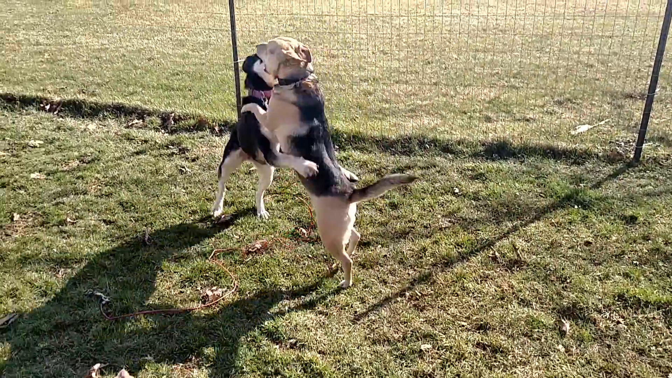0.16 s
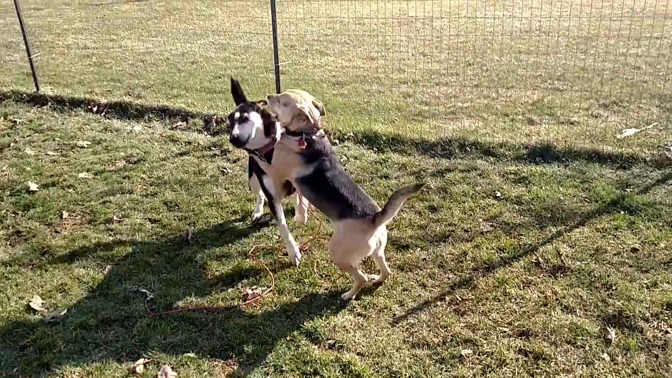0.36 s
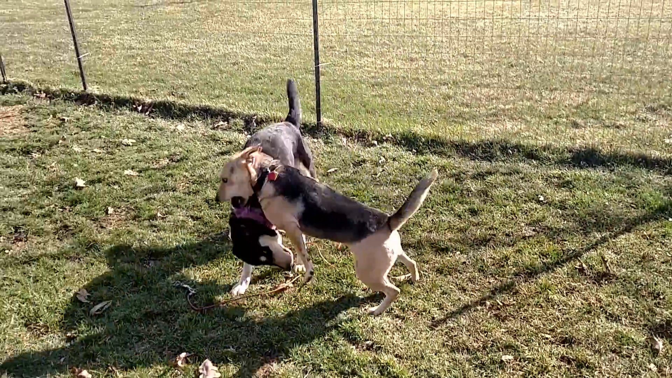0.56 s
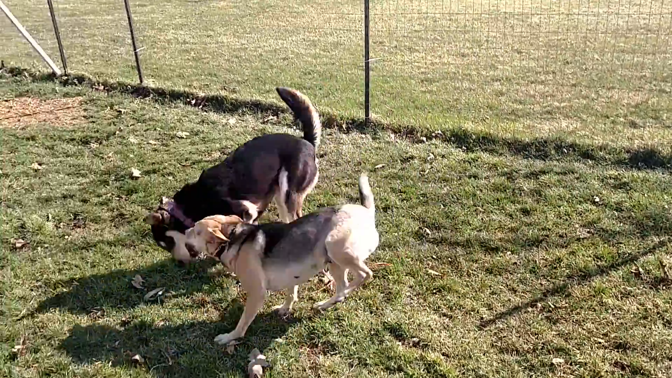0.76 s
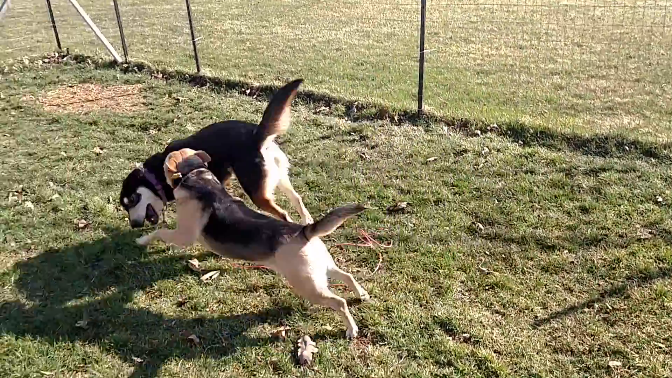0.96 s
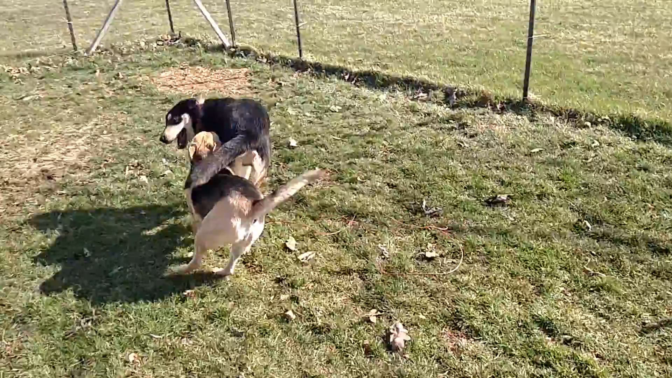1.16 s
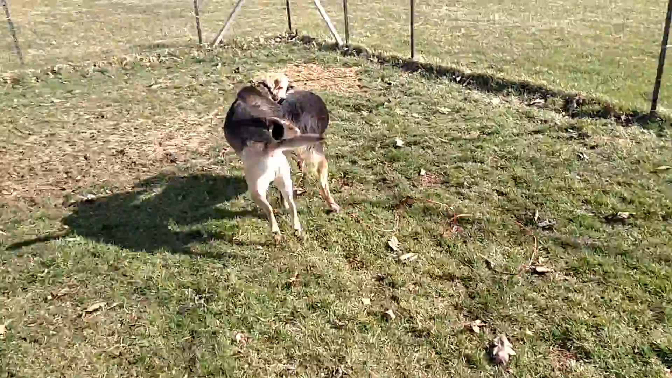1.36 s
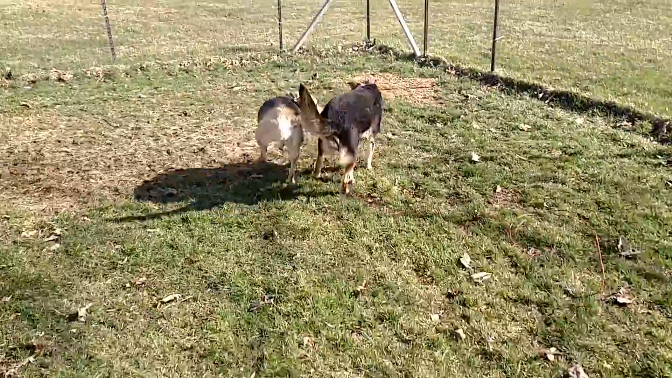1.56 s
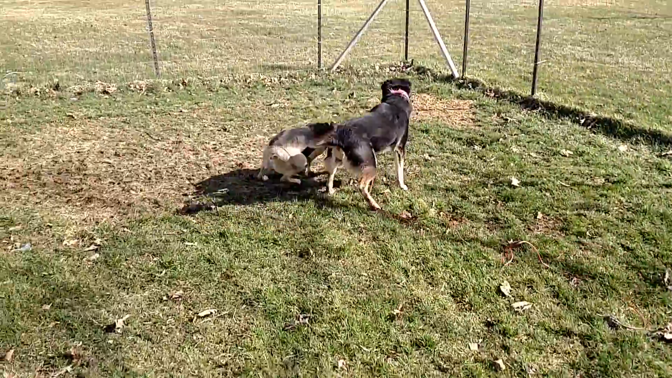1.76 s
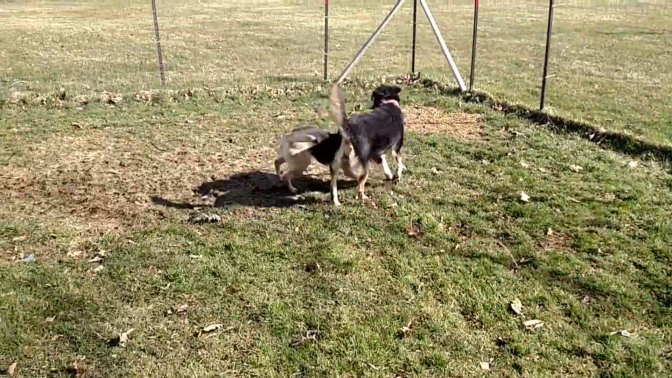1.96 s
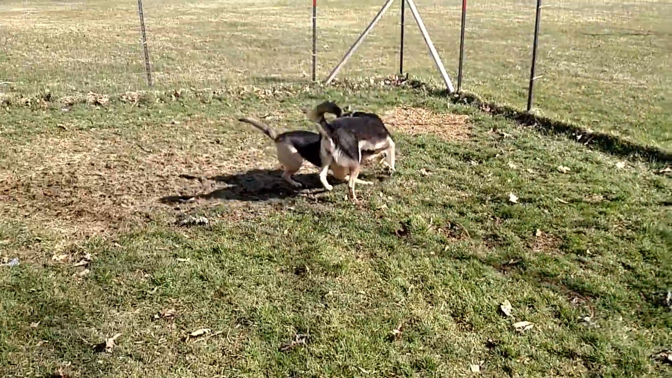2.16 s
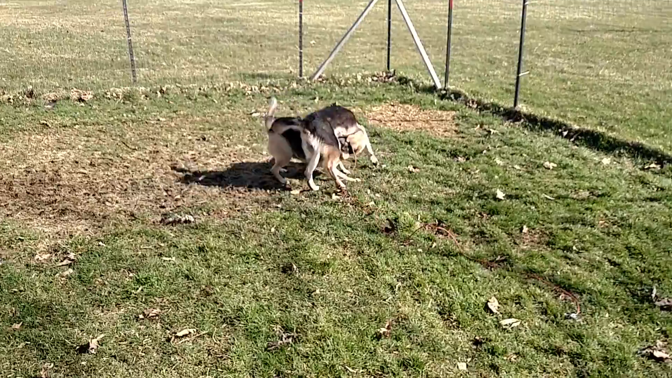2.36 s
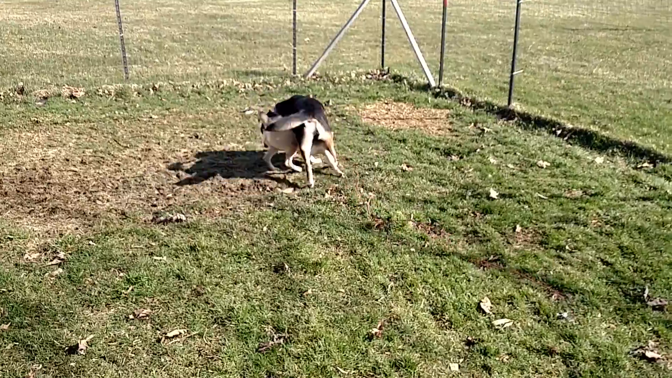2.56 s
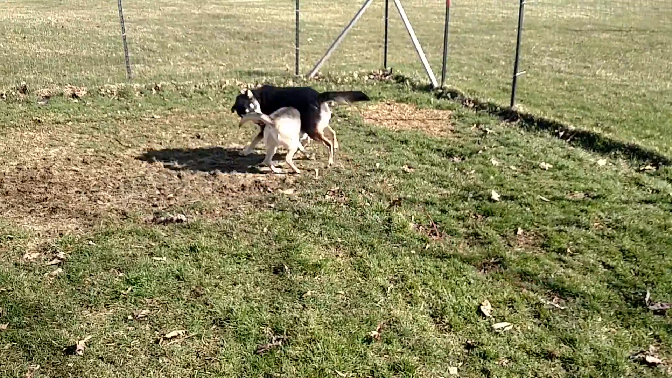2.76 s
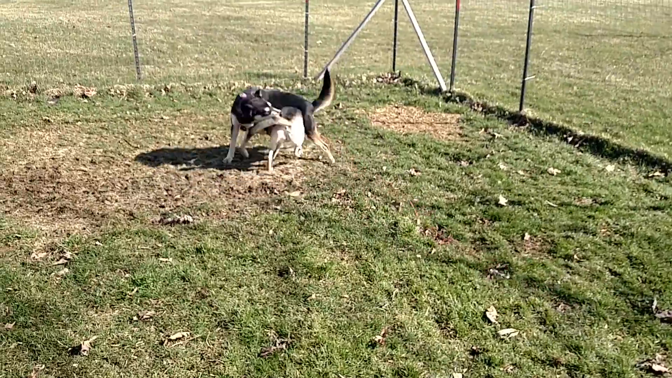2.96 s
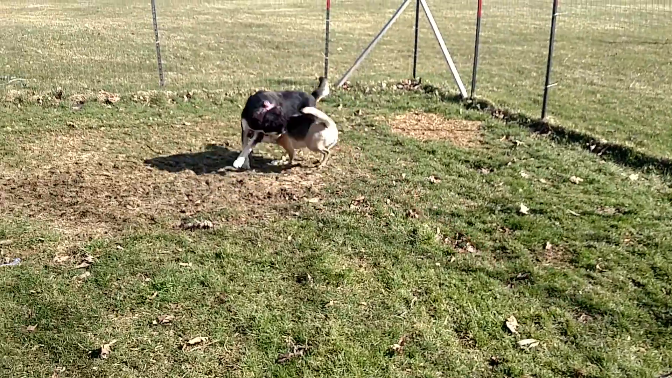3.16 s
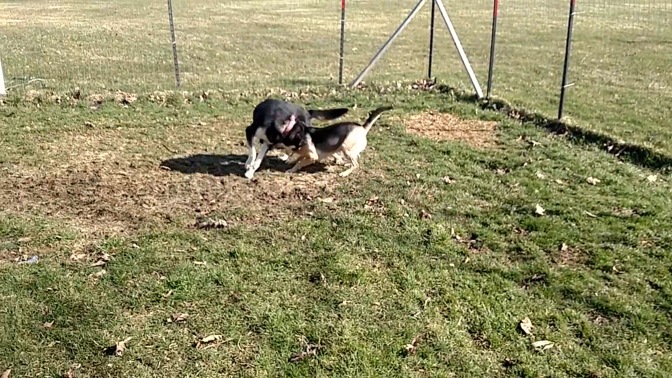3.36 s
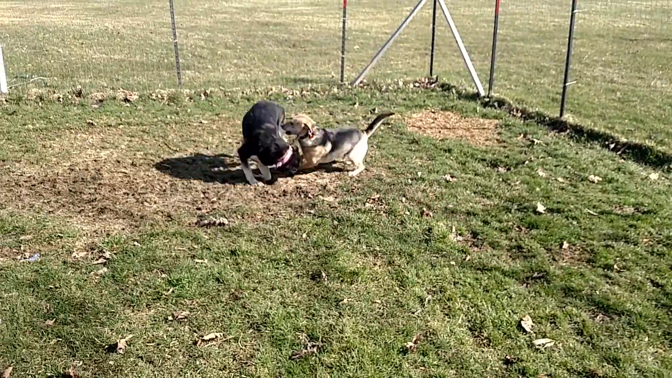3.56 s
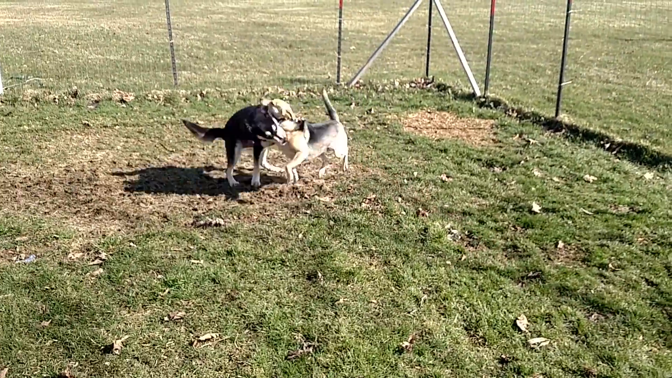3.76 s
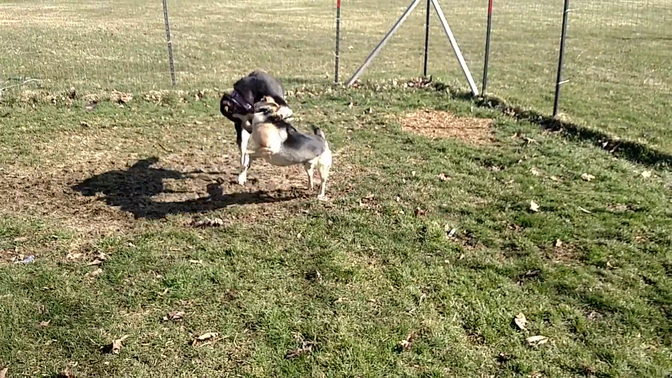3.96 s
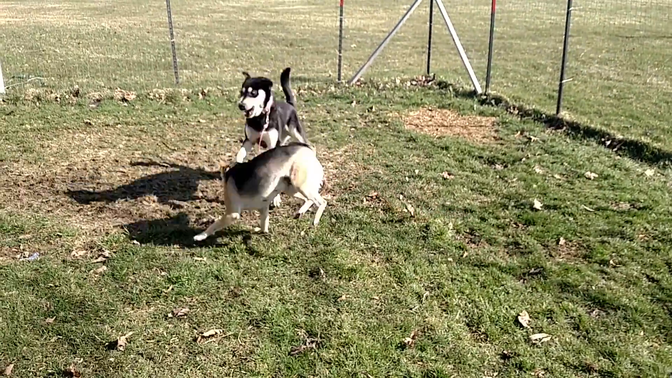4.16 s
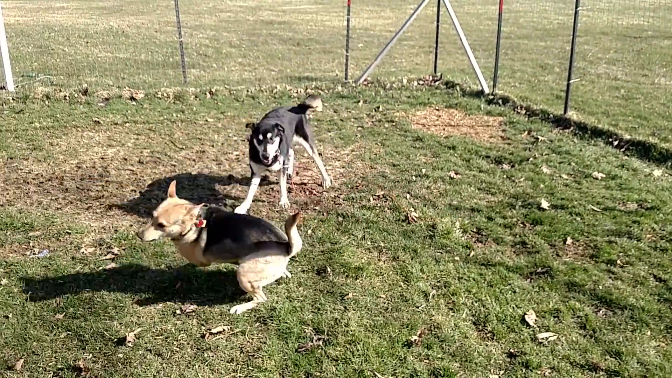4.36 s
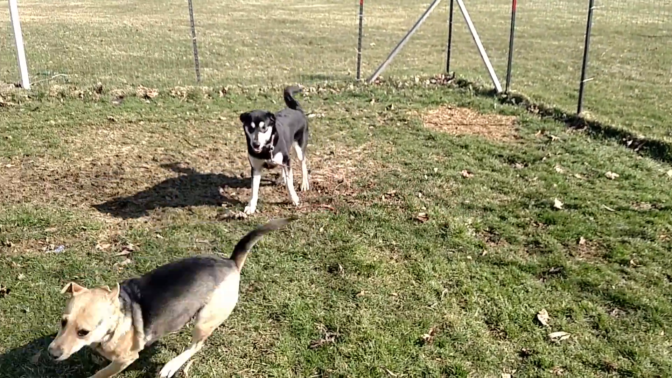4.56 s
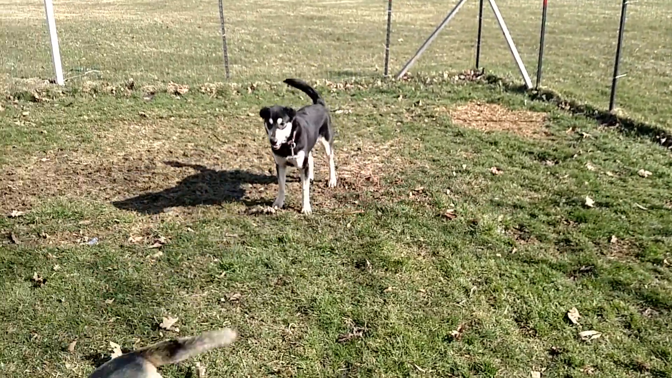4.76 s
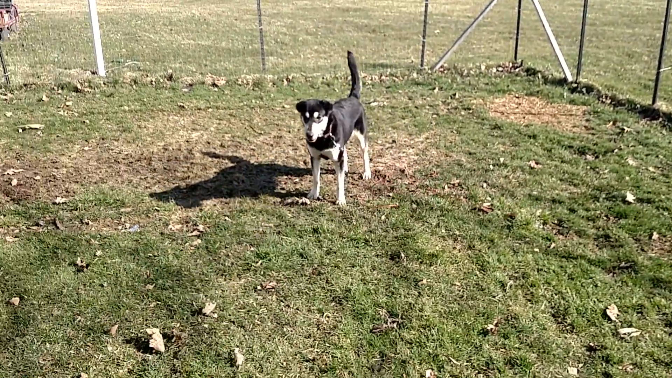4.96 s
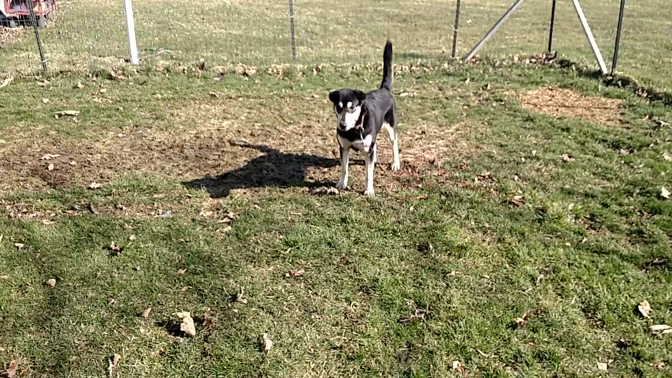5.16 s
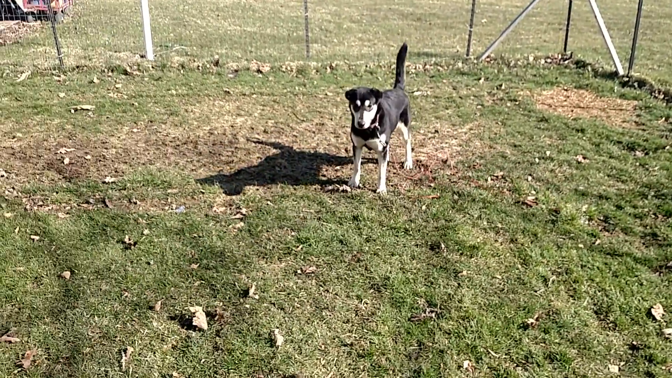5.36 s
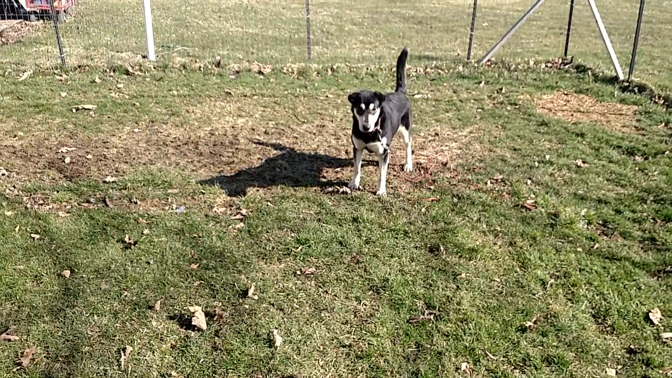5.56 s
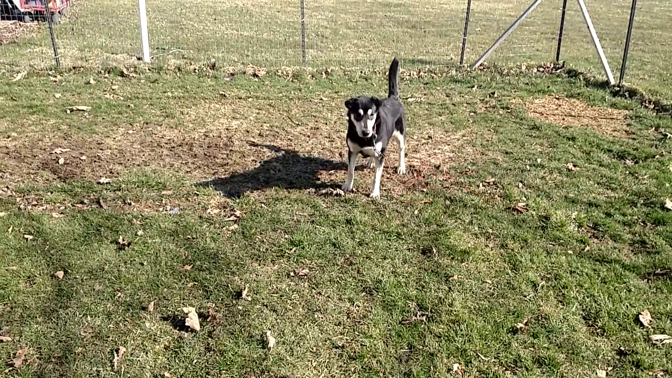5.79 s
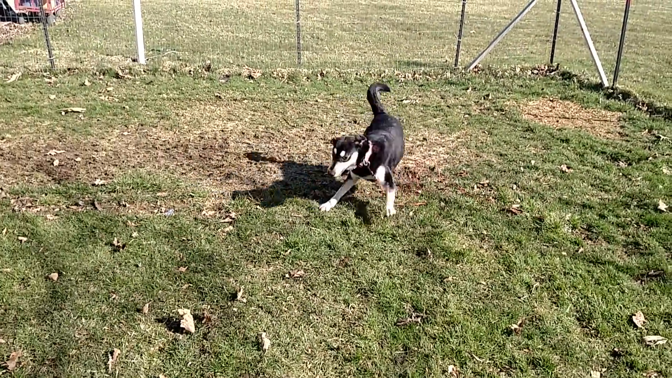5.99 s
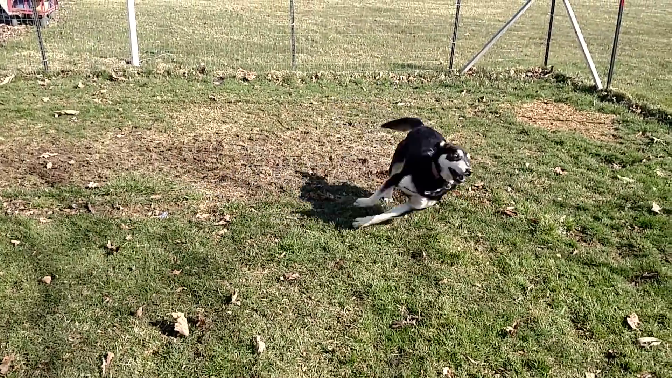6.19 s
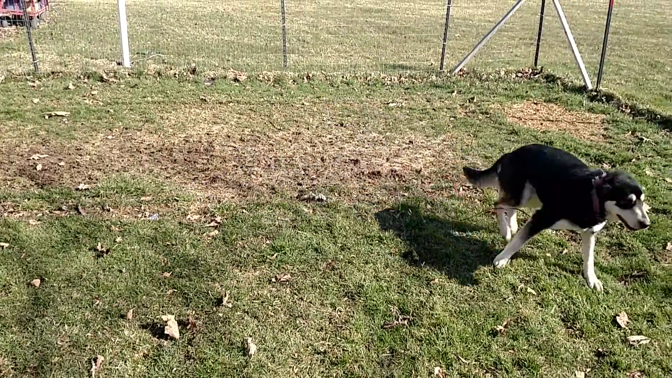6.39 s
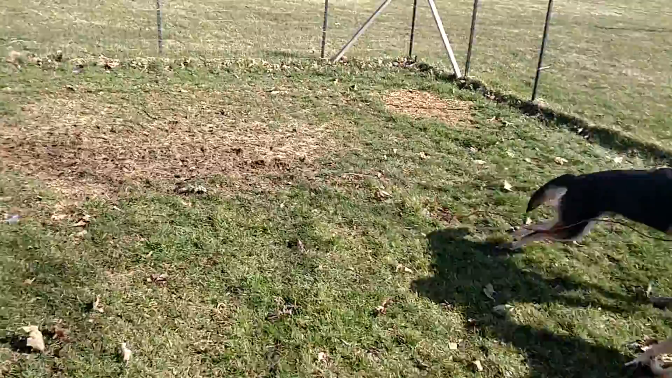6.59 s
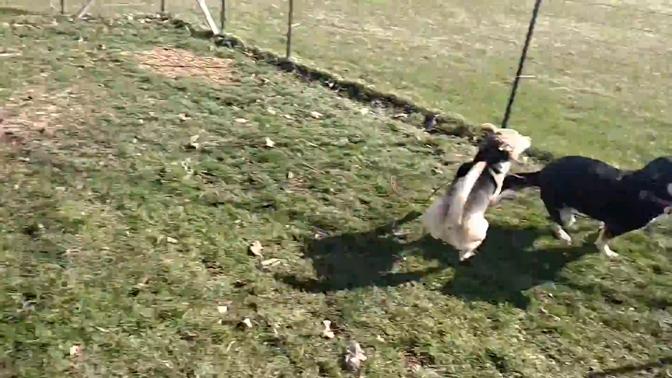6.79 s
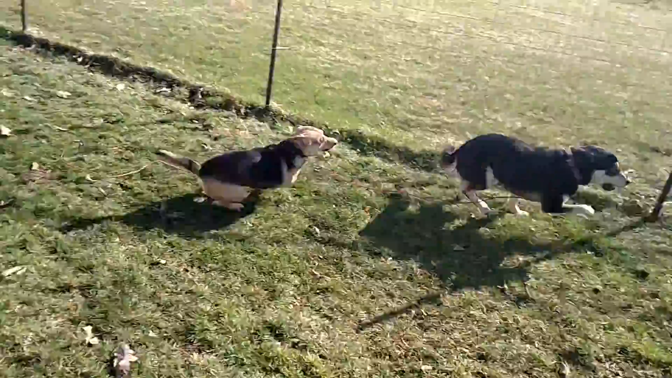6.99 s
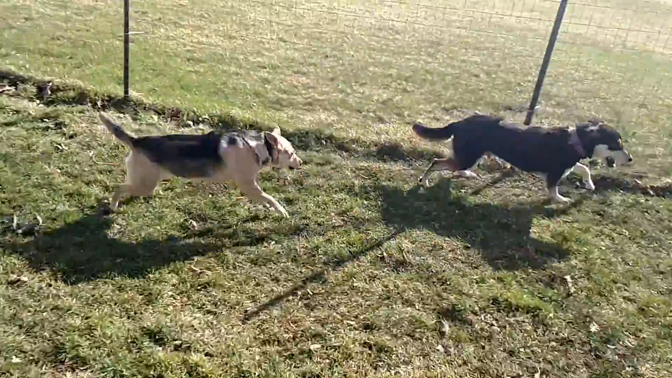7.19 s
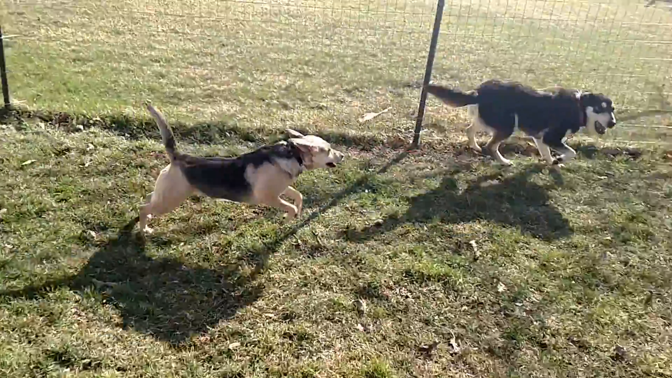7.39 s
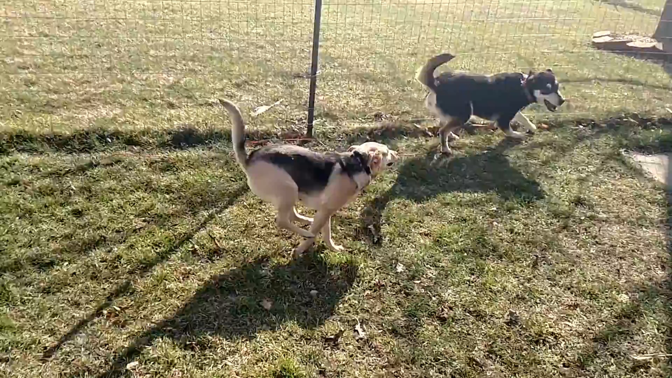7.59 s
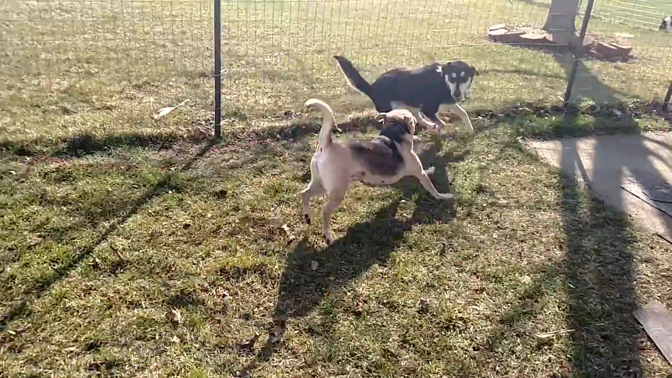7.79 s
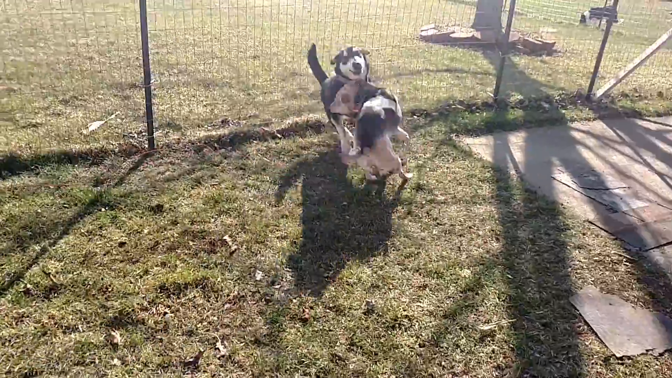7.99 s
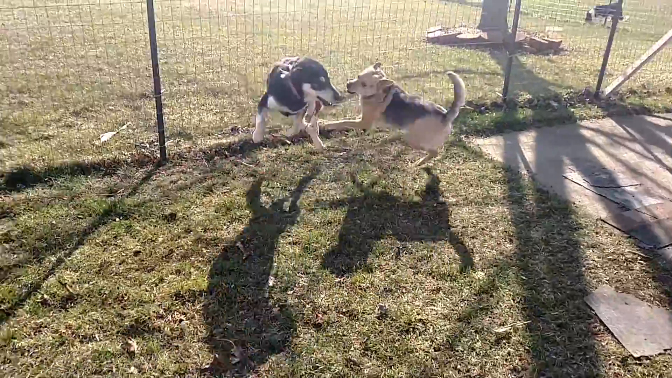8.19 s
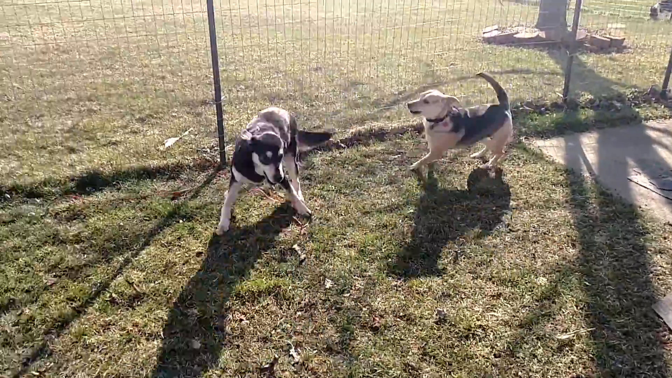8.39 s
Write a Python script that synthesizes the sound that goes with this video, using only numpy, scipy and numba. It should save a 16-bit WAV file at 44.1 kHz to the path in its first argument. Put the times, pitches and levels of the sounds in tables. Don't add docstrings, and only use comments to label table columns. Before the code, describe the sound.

Ragged dog growls and throaty barks tumble close by outdoors, pause under thudding wind on the microphone, then flare up again over rustling grass.

```python
import sys
import numpy as np
from scipy import signal
from scipy.io import wavfile
from scipy.ndimage import uniform_filter1d
from numba import njit

SR = 44100
rng = np.random.default_rng(int(sys.argv[2]) if len(sys.argv) > 2 else 0)


def elevation(decibels):
    levels = np.asarray(decibels, float)
    return 10 ** (levels / 20)


def wav_out(sig):
    wavfile.write(sys.argv[1], SR, np.round(np.clip(np.atleast_2d(sig).T, -1, 1) * 32767).astype(np.int16))


N = 372204

FOLD_MANNERS = {"roar": (98, .4, .43), "rattle": (90, .3, .33), "bark": (105, .6, .07),
                "snarl": (95, 1.0, .33), "grumble": (50, .8, .2), "deep": (85, .35, .05)}
BODY_COLOUR = {"roar": (0.59, -0.85, -26.5), "rattle": (-0.34, -0.55, -11), "bark": (-4, 0.1, -16.5),
               "snarl": (0.22, 0.82, 1.7), "grumble": (1.7, -0.4, -11), "deep": (4.6, -10.5, -13)}
# start_s, length_s, start_db, end_db, mouth_hz (midway)
ROARS = [
    (0.0, 0.12, -31, -27, 950),
    (.143, 0.11, -28.5, -27.5, 830),
    (.279, .09, -32.5, -26, 890),
]
RATTLES = [(2.515, 0.04, -36.5, -29.5, 663), (2.56, 0.044, -47, -36.5, 640), (2.64, 0.32, -41.5, -44, 700),
           (3.344, 0.11, -42.5, -43.5, 583), (3.48, 0.14, -39.5, -42.5, 706), (4.08, 0.07, -47, -52, 754),
           (6.405, 0.052, -32.5, -33.5, 800), (6.58, .15, -42, -32.5, 707),
           (7.876, 0.057, -35.5, -38.5, 833.4), (7.93, .11, -39.5, -44, 542.4),
           (8.045, 0.056, -33, -34.5, 774.6)]
BARKS = [(.37, 0.082, -32, -40, 953), (.945, 0.148, -27.5, -26, 786), (1.1, 0.14, -28, -39.5, 688),
         (1.22, 0.14, -27, -41, 790), (1.41, 0.2, -42, -37, 760), (3.64, 0.1, -45.5, -35.5, 986),
         (3.788, 0.16, -40.5, -59, 1130), (6.46, .1, -33, -31.5, 800.6), (6.742, 0.062, -24.5, -24, 533),
         (6.8, 0.062, -23, -29.5, 604), (8.112, 0.07, -25, -22, 928), (8.19, 0.098, -17.5, -26, 740),
         (8.29, 0.15, -27, -28, 635)]
SNARLS = [
    (.836, 0.083, -25.5, -27.5, 957),
    (6.29, 0.013, -31.5, -42.5, 1010),
    (7.275, 0.033, -46.5, -42, 893),
    (7.31, 0.046, -36.5, -39.5, 870),
    (7.39, 0.11, -54.5, -62, 1110),
]
GRUMBLES = [
    (.525, 0.1, -41, -40, 1093),
    (.63, 0.16, -40, -37.5, 900),
    (6.935, 0.083, -28.5, -41.5, 716),
    (7.095, 0.06, -44.5, -51, 1040),
]
DEEP_GROWLS = [
    (1.697, .035, -39, -37, 660),
    (1.735, .035, -35, -33, 520),
    (1.775, .03, -38, -39, 340),
    (1.805, .03, -40, -40, 300),
    (1.855, .06, -41, -41, 540),
    (1.92, .09, -40, -37, 700),
    (2.01, .15, -39, -40, 760),
]
# time_s, muzzle_hz, lips_drawn_db, chest_turned_db
POSTURE = [
    [(0.0, 1750, 2, -3), (.36, 1440, -38, -5.5), (.53, 1900, 6, 6), (.75, 2200, 9, 1.5),
     (.86, 1169, -4, 6.5), (.95, 1850, 0, -1), (1.04, 1890, -7.5, 0), (1.35, 1850, 4.5, 5.5),
     (1.65, 1717, 1, 1.5)],
    [(1.75, 1250, 11, 0), (1.93, 1566, 10.5, -2.5), (2.1, 2080, 10, -0.5), (2.25, 1560, 31, 5),
     (2.42, 2030, 1, 6), (2.6, 1493, -7, 3), (2.76, 1384, -1.5, 5), (2.9, 1990, -5, 7.5)],
    [(3.35, 1940, -20, 2), (3.58, 2220, 0.5, 9.5), (3.73, 2538, 4.5, 0.5), (3.9, 1700, -7, -14),
     (4.1, 1935, 0.5, 7)],
    [(6.3, 1680, 2, 4), (6.43, 2033, 4.5, 8.5), (6.72, 1430, -3.5, 5), (6.8, 1850, -3, -2),
     (6.9, 1780, -1, 4.5), (7.03, 1897, 11, 4), (7.33, 1772, -3.5, 4), (7.58, 1968, 7, -20),
     (8.0, 1540, -8.5, 14), (8.15, 1740, 1.5, -3.5), (8.32, 1930, -1.5, 2.5)],
]
# multiple_of_lip_hz, width_hz, level_db (re lips)
UPPER_LIP = [(1.38, 310, -9)]
# start_s, peak_db
HARD_FLAPS = [(.029, -11), (.106, -6), (0.143, -12), (.209, -13), (0.279, -13), (0.321, -7.5), (0.514, -19),
              (0.535, -18), (0.558, -13.5), (0.591, -16), (0.861, -4.5), (1.037, -7), (1.069, -6.5),
              (1.457, -13.5), (2.639, -23), (2.667, -23), (2.676, -22), (2.699, -22), (2.709, -17),
              (3.708, -17.5), (3.785, -17.5), (6.289, -56), (6.742, -26.5), (6.838, -7.5), (6.955, -8),
              (6.972, -23), (6.995, -20), (7.74, -26), (7.879, -16.5), (8.107, -7), (8.117, -1.5),
              (8.148, -12), (8.18, -10), (8.27, -12), (8.318, -13.5), (8.369, -14.5)]
# start_s, length_s, flaps_per_s, peak_db
HARD_RUNS = [
    (.0025, .115, 101, -11),
    (.154, .05, 91, -15),
    (1.528, .09, 63, -20),
    (8.131, .07, 63, -7),
]
# start_s, length_s, flaps_per_s, peak_db
SOFT_RUNS = [
    (1.696, .08, 93, -22),
    (1.784, .07, 95, -22),
    (1.87, .1, 83, -27),
]
# start_s, length_s, level_db, start_hz, end_hz
RASPS = [(0.0, 0.11, -36.5, 1460, 1680), (0.85, 0.13, -32.5, 1220, 1620), (0.94, 0.026, -32, 1980, 2000),
         (.493, .012, -47, 1100, 1150), (0.365, 0.022, -45, 2260, 2370), (1.43, .04, -44, 2000, 1800),
         (1.317, 0.028, -43, 1970, 2320), (1.061, 0.068, -46.5, 1570, 1570), (1.746, 0.13, -52, 1250, 1380),
         (2.027, 0.12, -40.5, 605, 600), (2.222, 0.17, -51, 1486, 2110), (7.422, 0.18, -47, 1230, 1089),
         (2.495, .012, -50, 700, 750), (3.655, 0.11, -52, 1560, 1800), (5.803, 0.089, -55, 1900, 1800),
         (6.415, 0.067, -40, 1200, 1500), (6.754, 0.1, -43, 1250, 1150), (7.28, 0.085, -46, 1000, 1420),
         (7.939, 0.08, -42, 1270, 1259), (8.114, 0.072, -32, 1400, 1822), (8.3, 0.17, -41, 1310, 1618)]
# centre_hz, width_hz, level_db (re rasp)
THROAT = [(3020, 770, -22.5), (4610, 120, -35), (5900, 1050, -26), (6840, 450, -28.5)]
# peak_s, level_db, rise_s, fall_s (rise and fall through 10 dB)
SCUFFS = [(.16, -48, 0.044, 0.37), (.8, -46.5, 0.53, 0.023), (1.1, -57, 0.57, 0.82),
          (1.675, -52, 0.018, 0.065), (1.93, -59, 0.025, 0.05), (2.11, -48, 0.053, 0.025),
          (2.28, -48.5, 0.081, 0.044), (2.75, -47.5, 0.042, 0.021), (3.8, -58, 1.17, 0.23),
          (4.63, -34.5, 0.01, 0.035), (4.72, -54.5, .05, 0.26), (4.98, -49, 0.02, 0.027),
          (6.16, -51, 0.15, 0.69), (6.42, -42.5, 0.096, 0.14), (6.65, -49.5, 0.35, 0.11),
          (6.96, -49.5, 0.27, 0.31), (7.36, -48.5, 0.15, 0.24), (7.62, -56, 0.23, 0.92),
          (8.15, -52.5, 0.11, 2.8)]
# centre_hz, level_db (per Hz)
GRASS_COLOUR = [(1470, 8), (2500, 6.5), (3370, 1.5), (4170, 0.5), (8480, -4), (11200, -50), (15500, 28)]
# peak_s, level_db, rise_s, fall_s (rise and fall through 10 dB)
GUSTS = [(.11, -47.5, 0.24, 0.2), (.56, -51, 0.063, 0.038), (.88, -28.5, 0.044, 0.093),
         (1.15, -41.5, 0.22, 0.48), (1.47, -37, 0.17, 0.38), (2.08, -42.5, 0.17, 0.14),
         (2.87, -57, 0.16, 0.44), (3.6, -41, 0.2, 0.077), (3.94, -42.5, 0.3, 0.026),
         (4.25, -44.5, 0.18, 0.7), (4.55, -29, 0.1, 0.18), (4.76, -24.5, 0.052, 0.068),
         (5.02, -26, 0.31, 0.12), (5.55, -44, 0.91, 0.26), (6.07, -46.5, 0.16, 0.28),
         (6.67, -39, 0.26, 0.095)]
# start_s, peak_db, swing_hz
EDDIES = [(0.824, -12.5, 121), (0.876, -15.5, 108), (1.464, -19.5, 88), (3.598, -29, 137), (3.94, -27, 94),
          (4.539, -16.5, 202), (4.571, -13, 151), (4.726, -14, 93), (4.767, -12, 123), (4.838, -5, 211),
          (4.912, -8.5, 183), (4.98, -10, 158), (5.047, -11.5, 134)]
# centre_hz, level_db (per Hz)
HUSH_COLOUR = [(35, -34), (60, -9), (139, 5), (351, -9), (497, -5.5), (1050, -8.5), (2780, -20),
               (6260, -24), (15500, -32)]
# start_s, peak_db, ring_hz
TAGS = [(0.0164, -56, 8090), (0.154, -45, 12200), (0.297, -47, 8100), (0.7667, -47, 11900),
        (0.7966, -42, 12000), (0.8744, -42, 10900), (0.9, -32, 11300), (0.924, -28.5, 11000),
        (1.053, -35, 10800), (1.1376, -41, 8000), (1.4152, -47, 11000), (1.6611, -41, 9600),
        (2.218, -42, 8300), (2.2508, -41.5, 8200), (2.748, -39, 9600), (3.0267, -42, 8500),
        (3.1113, -37, 8900), (3.2735, -43, 8700), (3.6032, -51, 9620), (3.832, -41, 9600),
        (4.0745, -45, 8680), (4.2887, -53, 12000), (4.3316, -44, 8500), (4.484, -54, 8900),
        (4.5052, -48, 8040), (4.5845, -58, 8240), (4.6255, -40, 7900), (4.7245, -43, 10900),
        (4.9337, -47, 8970), (4.978, -35.5, 8700), (5.0983, -48, 9200), (6.0142, -42, 8700),
        (6.107, -37, 11600), (6.1552, -35, 9400), (6.3454, -39, 10500), (6.4098, -42, 8250),
        (6.4767, -51, 8074), (6.6054, -34, 8740), (6.6555, -27.5, 8100), (6.8402, -40, 8800),
        (7.219, -43, 9530), (7.2759, -42, 9700), (7.359, -44, 7800), (7.616, -37, 14400),
        (7.751, -47, 8560), (8.3552, -36, 9800)]
# start_s, peak_db, ring_hz
TICKS = [(0.017, -27, 5500), (0.876, -27, 4130), (0.9226, -38, 4100), (1.138, -36, 5140),
         (1.869, -34, 6040), (2.0807, -44, 4805), (3.111, -45, 9200), (3.825, -26.5, 4450),
         (4.078, -29.5, 7340), (4.332, -45.5, 8850), (4.484, -35, 5200), (4.5855, -33.5, 4320),
         (4.6233, -18, 5700), (4.935, -38, 4630), (6.0142, -32, 3370), (6.1068, -27.5, 5100),
         (6.1556, -33, 9700), (6.272, -28, 3350), (6.344, -25.5, 3612), (6.3948, -41, 3990),
         (6.4108, -25.5, 5400), (6.657, -26, 3940), (6.787, -34, 6860), (7.218, -31, 2470),
         (7.357, -29, 6820), (7.618, -38, 7300)]
# time_s, pitch_hz, level_db
WHISTLES = [
    [(.11, 4900, -63), (.13, 5090, -54), (.18, 5030, -62)],
    [(3.77, 4900, -70), (3.83, 4870, -63), (3.87, 4690, -61), (3.95, 4670, -59.5), (4.0, 4650, -63),
     (4.07, 4650, -73)],
    [(6.985, 5083, -72), (7.025, 5200, -54), (7.05, 4940, -51), (7.085, 4640, -52), (7.13, 4770, -66),
     (7.24, 4760, -69)],
    [(7.28, 4800, -65), (7.35, 4800, -64)],
]
# start_s, length_s, level_db, start_hz, end_hz
STREAKS = [(.85, .08, -49, 4300, 4250), (.935, .04, -50, 2900, 3050), (1.01, 0.076, -52, 2660, 3050),
           (1.15, 0.095, -55, 2660, 2860), (1.28, .075, -67, 4030, 4200), (1.43, 0.21, -62, 4000, 4200),
           (1.75, 0.15, -56, 2680, 2550), (1.93, 0.088, -54, 2480, 2690), (2.08, 0.035, -47, 2900, 2850),
           (2.53, 0.054, -58.5, 3730, 3500), (2.81, 0.073, -57.5, 2550, 2600),
           (2.935, 0.042, -59, 2970, 3330), (3.66, .11, -56, 3600, 4400), (5.838, .04, -52, 2640, 2550),
           (6.735, 0.094, -54.5, 2630, 2706), (8.12, .13, -49.5, 3200, 3320), (8.27, .07, -60, 5100, 5400),
           (8.36, 0.095, -49.5, 2580, 3060)]
# start_s, length_s, flaps_per_s, peak_db, share_gone_at_peak, slowing_per_flap
CREAKS = [
    (2.221, .17, 51, -31, .4, .028),
    (7.08, .05, 47, -31, .5, 0),
    (7.501, .14, 32, -30, .6, 0),
    (7.739, .095, 36, -37, .4, 0),
]
# start_s, peak_db
PAWS = [
    (3.123, -42),
    (3.187, -44),
    (3.215, -38.5),
    (4.024, -51),
    (4.985, -21),
    (5.27, -43),
    (5.799, -48),
    (6.012, -45),
    (6.092, -45.5),
]
# start_s, length_s, level_db, mouth_hz
PANTS = [(4.21, 0.021, -53, 1660), (4.447, 0.011, -48.5, 1110), (4.635, 0.082, -34.5, 1334),
         (4.765, 0.07, -46, 1560), (4.888, 0.01, -48, 1360), (4.967, 0.036, -33, 1400),
         (5.057, 0.013, -46, 1450), (5.245, 0.067, -42.5, 1360), (5.8, .02, -42, 1240),
         (5.818, 0.03, -38.5, 1385), (5.862, .02, -40.5, 1430), (5.968, 0.3, -51.5, 1190)]


def rms_one(x):
    return x / np.sqrt(np.mean(x ** 2) + 1e-20)


def evened(x, over_s):
    return x / np.sqrt(uniform_filter1d(x ** 2, int(over_s * SR)) + 1e-12)


def cut(x, hz, kind, order=2):
    return signal.sosfilt(signal.butter(order, hz, kind, fs=SR, output="sos"), x)


def drift(rate):
    r = np.exp(-80 * np.pi * rate / SR)
    chance = rng.standard_normal(N // 40 + 2002)
    slow = signal.lfilter([1], [1, -2 * r, r * r], chance)[2000:]
    return np.interp(np.arange(N) / 40, np.arange(len(slow)), rms_one(slow))


@njit
def ring_loop(x, c, r):
    out = np.zeros(len(x))
    for i in range(2, len(x)):
        out[i] = (1 - r) * (x[i] - x[i - 2]) + 2 * r * c[i] * out[i - 1] - r * r * out[i - 2]
    return out


def cavity(x, hz, width_hz):
    return ring_loop(x + 1e-18, np.cos(2 * np.pi * hz / SR) + np.zeros(N), np.exp(-np.pi * width_hz / SR))


def pouch(x, hz, width_hz):
    return cavity(cavity(cavity(x, hz, width_hz), hz, 3 * width_hz), hz, 4 * width_hz)


def coloured(spectrum, patchy_db):
    out = 0
    white = rng.standard_normal((2, N))
    hz, level_db = np.transpose(spectrum)
    edges = 60 * 2 ** np.arange(0, 8.4, .5)
    for k, (low, high) in enumerate(zip(edges, edges[1:])):
        gain_db = np.interp(np.log(low * high) / 2, np.log(hz), level_db, left=-110)
        flicker_db = patchy_db * drift(23.5)
        out = out + elevation(gain_db + flicker_db) * cut(white[k % 2], [low, high], "band")
    return rms_one(out)


def per_ms(values):
    return np.interp(np.arange(N) / SR, np.arange(len(values)) / 1000, values)


def in_time(rows):
    s, *columns = np.transpose(rows)
    return [np.interp(np.arange(N) / SR, s, c) for c in columns]


def pushes(s, length_s, attack_db_per_s, release_db_per_s):
    since = np.arange(N / SR * 1000 + 1) / 1000 - s[:, None]
    over = since - length_s[:, None]
    gone = np.clip(since / length_s[:, None], 0, 1)
    return gone, np.minimum(0, np.minimum(since * attack_db_per_s, -over * release_db_per_s))


def glides(rows, attack_db_per_s, release_db_per_s):
    s, length_s, db, start_hz, end_hz = np.transpose(rows)
    gone, edge_db = pushes(s, length_s, attack_db_per_s, release_db_per_s)
    level_db = db[:, None] + edge_db
    hz = start_hz[:, None] + gone * (end_hz - start_hz)[:, None]
    now = level_db.argmax(axis=0), np.arange(gone.shape[1])
    return per_ms(level_db[now]), per_ms(hz[now])


def swells(rows, still_db):
    t = np.arange(N / SR * 1000 + 1) / 1000
    each = [db - 10 * np.maximum((s - t) / rise_s, (t - s) / fall_s) for s, db, rise_s, fall_s in rows]
    return per_ms(np.maximum(np.max(each, axis=0), still_db))


def strikes(events):
    out = np.zeros(N)
    for s, peak_db, *_ in events:
        out[min(round(s * SR), N - 1)] = elevation(peak_db)
    return out


def runs(table):
    rows = []
    for s, length_s, per_s, peak_db in table:
        at = np.arange(s, s + length_s, 1 / per_s)
        late, uneven = rng.standard_normal((len(at), 2)).T
        rows += zip(at + .0006 * late, peak_db + 2.0 * uneven)
    return rows


def folds(per_s, breath, jitter, shimmer_db):
    turns = np.cumsum(per_s * np.exp(jitter * drift(40) + .1 * drift(4))) / SR
    strength = elevation(shimmer_db * drift(21.5))
    slaps = np.diff(np.floor(turns), prepend=0) * strength
    puffs = evened(strength * np.exp(-1.5 * (turns % 1)) * rng.standard_normal(N), 0.46)
    return evened(slaps, 0.03) + 2.0 * breath * puffs, puffs


def effort():
    kinds = dict(roar=ROARS, rattle=RATTLES, bark=BARKS, snarl=SNARLS, grumble=GRUMBLES, deep=DEEP_GROWLS)
    rows = np.array(sorted(row + FOLD_MANNERS[name] + BODY_COLOUR[name]
                           for name in kinds for row in kinds[name]))
    s, length_s, start_db, end_db, hz = rows[:, :5].T
    gone, edge_db = pushes(s, length_s, attack_db_per_s=2200, release_db_per_s=894)
    hold_db = start_db[:, None] + gone * (end_db - start_db)[:, None]
    now = np.argmax(hold_db + edge_db, axis=0), np.arange(gone.shape[1])
    manner = uniform_filter1d(rows[now[0], 5:], size=25, axis=0).T
    jaw_hz = np.interp(np.arange(N) / SR, s + length_s / 2, hz)
    return per_ms(hold_db[now]), per_ms(edge_db[now]), jaw_hz, [per_ms(m) for m in manner]


def growl_mouth(voice, mouth_hz, split):
    width_hz = 125
    back = elevation(2) * pouch(voice, mouth_hz * (1 - split), width_hz)
    front = pouch(voice, np.minimum(mouth_hz * (1.133 + 1.184 * split), 1200), width_hz)
    return evened(pouch(voice, mouth_hz, width_hz) - back - front, 0.054)


def growl_chest(voice):
    chest = evened(pouch(voice, 205.6, 132), 0.22)
    return chest + elevation(-6) * evened(pouch(voice, 151, 83), 0.08)


def growl_lips(voice, puffs, lip_hz, nose_db):
    airy = puffs + 0.28 * voice
    upper = 0
    for times, width_hz, db in UPPER_LIP:
        level = elevation(db + 4.0 * drift(8.7))
        upper = upper + level * pouch(airy, times * lip_hz * np.exp(0.05 * drift(4.2)), width_hz)
    lips = pouch(airy, lip_hz, 200) + elevation(-2.5) * cavity(airy, 1.084 * lip_hz, 220)
    nose = elevation(nose_db - 11 + 1.0 * drift(23)) * pouch(puffs, 4220, 450)
    return evened(lips - upper + nose, 0.74)


def growls():
    mouth_db, edge_db, mouth_hz, manner = effort()
    per_s, breath, split, chest_db, lip_db, nose_db = manner
    lip_hz, bared_db, turned_db = in_time(sum(POSTURE, []))
    above_usual_db = mouth_db + 35
    chest_db = chest_db + turned_db - 43 + 0.67 * above_usual_db
    lip_db = lip_db + bared_db - 46.5 + 0.59 * above_usual_db
    voice, puffs = folds(per_s, breath, jitter=.22, shimmer_db=3.0)
    mouth_hz = mouth_hz * np.exp(0.05 * drift(22.4))
    lip_hz = lip_hz * np.exp(.04 * drift(20))
    mouth = elevation(mouth_db) * growl_mouth(voice, mouth_hz, split)
    chest = elevation(chest_db) * growl_chest(voice)
    lips = elevation(lip_db) * growl_lips(voice, puffs, lip_hz, nose_db)
    hard = pouch(cut(strikes(HARD_FLAPS + runs(HARD_RUNS)), 1920, "low"), mouth_hz, 226)
    soft = cavity(cut(strikes(runs(SOFT_RUNS)), 900, "low"), mouth_hz, 150)
    soft = cavity(soft, mouth_hz, 300)
    return elevation(edge_db) * (mouth - chest - lips) + elevation(30.5) * hard + elevation(38.0) * soft


def rasps():
    level_db, gap_hz = glides(RASPS, attack_db_per_s=710, release_db_per_s=620)
    air = rng.standard_normal(N) * elevation(4.25 * drift(108))
    high = 0
    for hz, width_hz, rel_db in THROAT:
        patches = elevation(rel_db + 3.5 * drift(14))
        high = high + patches * rms_one(pouch(air, hz * np.exp(.02 * drift(8)), width_hz))
    return elevation(level_db) * (evened(pouch(air, gap_hz, 300), 0.36) + high)


def grass():
    clumps = elevation(3.0 * drift(45))
    sizes = elevation(5.2 * np.minimum(rng.exponential(1, N), 5)) * rng.choice([-1, 1], N)
    snaps = rng.random(N) < 250 * clumps ** 2 / SR
    grains = rms_one(cut(sizes * snaps, [3000, 10000], "band", order=1))
    rustle = clumps * coloured(GRASS_COLOUR, patchy_db=4.5) + 0.29 * grains
    return elevation(swells(SCUFFS, still_db=-68)) * evened(rustle, 0.14)


def wind():
    rumble_db = swells(GUSTS, still_db=-67)
    buffet_db = -42.5 + 1.83 * (rumble_db + 42.5)
    rumble = cut(cut(rng.standard_normal(N), 70, "low"), 28, "high") * elevation(2.5 * drift(8))
    buffet = cut(cut(rng.standard_normal(N), 149.0, "low", order=4), 114, "high")
    buffet = buffet * elevation(12.5 * drift(23.9))
    out = elevation(rumble_db) * evened(rumble, 0.088) + elevation(buffet_db - 6.0) * evened(buffet, 0.19)
    t = np.arange(N) / SR
    for s, peak_db, hz in EDDIES:
        near = slice(round(s * SR) - 200, round(s * SR) + 1800)
        cycles = (t[near] - s) * hz - .8
        envelope = np.exp(.3 - np.hypot(cycles, .14) / .45)
        out[near] -= elevation(peak_db) * np.cos(2 * np.pi * cycles) * envelope
    return out


def hush():
    return elevation(-56.5) * coloured(HUSH_COLOUR, patchy_db=4.0)


def tags():
    out, t = np.zeros(N + 3000), np.arange(3000) / SR
    chance = rng.standard_normal((len(TAGS), len(t)))
    for (s, peak_db, hz), noise in zip(TAGS, chance):
        rings = np.sin(2 * np.pi * hz * t) + 0.26 * np.sin(2 * np.pi * 0.95 * hz * t)
        rings = rings * elevation(-60 * t / 0.035)
        crack = noise * np.exp(-t / 0.0018)
        out[round(s * SR):][:len(t)] += elevation(peak_db) * (.14 * rings + 0.6 * crack)
    return cut(out[:N], 3400, "high")


def ticks():
    out, t = np.zeros(N + 900), np.arange(900) / SR
    crackle = cut(rng.standard_normal((len(TICKS), len(t))), 2560, "low", order=1)
    for (s, peak_db, hz), noise in zip(TICKS, crackle):
        ring = np.sin(2 * np.pi * hz * t) * np.exp(-t / 0.00093)
        burst = 0.91 * noise * np.exp(-t / 0.0041) + 0.68 * ring
        out[round(s * SR):][:len(t)] += elevation(peak_db) * burst
    return cut(out[:N], 520, "high")


def whistles():
    t, edge_s = np.arange(N) / SR, 0.0049
    gates = [np.clip(np.minimum(t - c[0][0], c[-1][0] - t) / edge_s + 1, 0, 1) for c in WHISTLES]
    hz, level_db = in_time(sorted(row for call in WHISTLES for row in call))
    tone = np.sin(2 * np.pi * np.cumsum(hz * np.exp(0.0012 * drift(59))) / SR)
    return np.max(gates, axis=0) * elevation(level_db + 8.5 + 2.7 * drift(33)) * tone


def streaks():
    level_db, hz = glides(STREAKS, attack_db_per_s=600, release_db_per_s=670)
    air = rng.standard_normal(N) * elevation(3.5 * drift(70))
    return elevation(level_db) * evened(pouch(air, hz * np.exp(0.033 * drift(19)), 420), 0.21)


def creaks():
    knocks, mouth_hz = np.zeros(N), 1072
    for s, length_s, per_s, peak_db, peak_at, slowing in CREAKS:
        since = np.arange(0, length_s, 1 / per_s)
        late, uneven = rng.standard_normal((len(since), 2)).T
        at = s + since * (1 + slowing * since * per_s) + .0015 * late
        arch_db = 7.5 * (2 * (since / length_s - peak_at)) ** 2
        knocks[(at * SR).astype(int)] = elevation(peak_db + 2.0 * uneven - arch_db)
    puffs = signal.lfilter([1], [1, -np.exp(-1 / (0.01 * SR))], knocks) * rng.standard_normal(N)
    chest = pouch(elevation(44.5) * cut(knocks, 470, "low") + elevation(12.5) * puffs, 291, 85)
    belly = elevation(41) * pouch(cut(knocks, 200, "low"), 154, 73)
    mouth = elevation(8.5) * (pouch(puffs, mouth_hz, 200) + pouch(puffs, 570, 330))
    lips = elevation(3.5) * pouch(puffs, 1.8 * mouth_hz, 410)
    return chest + belly + mouth + lips


def paws():
    return elevation(48.0) * cavity(cavity(strikes(PAWS), 309, 68), 520, 540)


def pants():
    s, length_s, db, hz = np.transpose(PANTS)
    gone, edge_db = pushes(s, length_s, attack_db_per_s=602, release_db_per_s=695)
    level_db = db[:, None] - 83 * gone * length_s[:, None] + edge_db
    mouth_db, mouth_hz = per_ms(level_db.max(axis=0)), per_ms(hz[level_db.argmax(axis=0)])
    air = rng.standard_normal(N) * elevation(4.4 * drift(18.5))
    mouth = cavity(cavity(air, mouth_hz, 140), mouth_hz, 840)
    below = elevation(-12.5) * cavity(air, 0.75 * mouth_hz, 220)
    above = elevation(-18.5) * cavity(air, 1.4 * mouth_hz, 220)
    upper = cavity(air, 1.74 * mouth_hz, 320) + elevation(-14.5) * cavity(air, 3000, 1200)
    breath = mouth - below - above - elevation(-24.5) * upper
    return elevation(mouth_db) * evened(cut(breath, 5200, "low", order=4), 0.31)


def lawn(x):
    out = x.copy()
    for lag_s, echo_db in ((.0021, -20.5), (.023, -15), (.047, -22)):
        lag = round(lag_s * SR)
        out[lag:] += elevation(echo_db) * cut(x, 3600, "low")[:-lag]
    return out


def scene():
    bodies = lawn(growls() + rasps() + streaks() + creaks() + paws() + pants())
    small_sounds = grass() + tags() + ticks() + whistles()
    return (bodies + small_sounds + wind() + hush())[None]


def low_pass(x):
    return signal.sosfilt(signal.butter(12, 16420, fs=SR, output="sos"), x)


def record(dry):
    rounded = 0.79 * np.tanh(dry / 0.83)
    top = signal.cheby2(10, 60, 16300, fs=SR, output="sos")
    mix = signal.sosfilt(top, cut(rounded, 9.3, "high"))
    return low_pass(mix)


dry = scene()
out = record(dry)
wav_out(out)
```